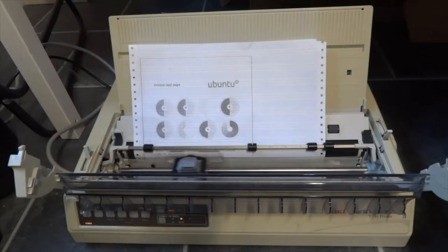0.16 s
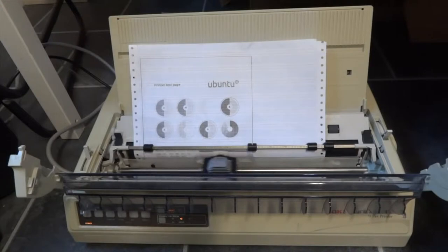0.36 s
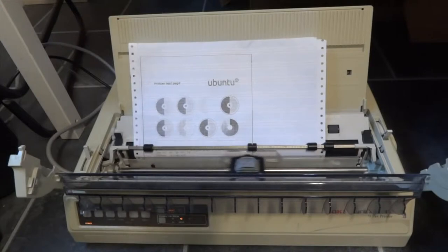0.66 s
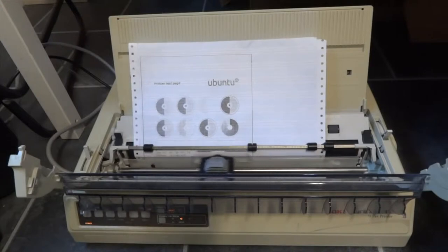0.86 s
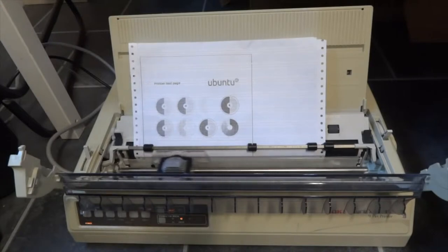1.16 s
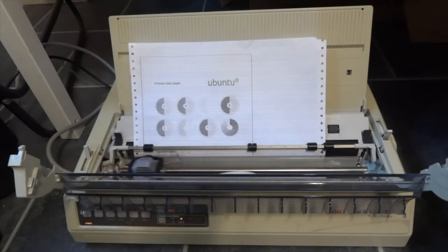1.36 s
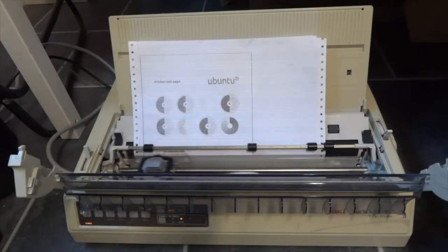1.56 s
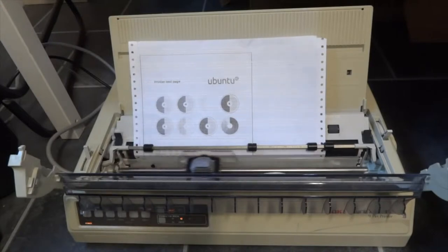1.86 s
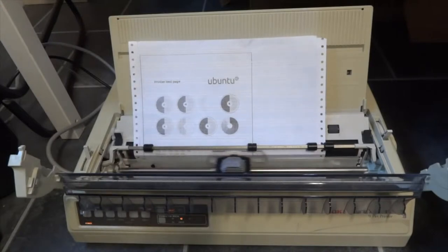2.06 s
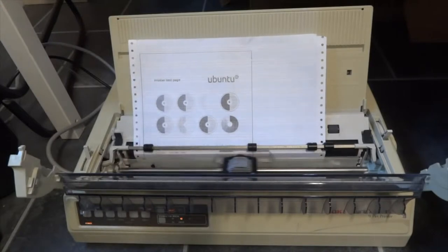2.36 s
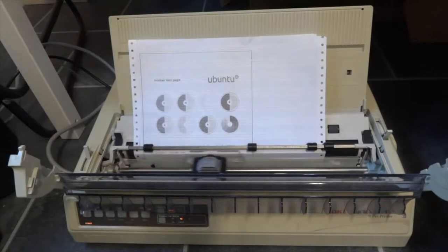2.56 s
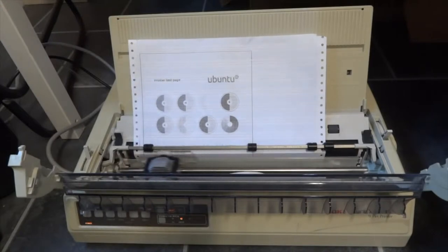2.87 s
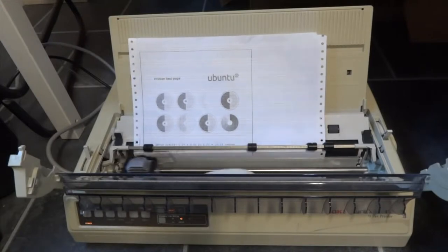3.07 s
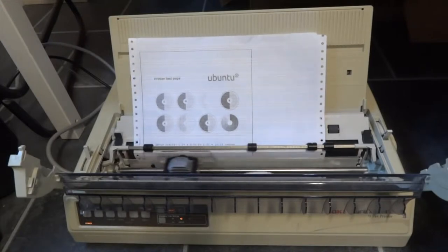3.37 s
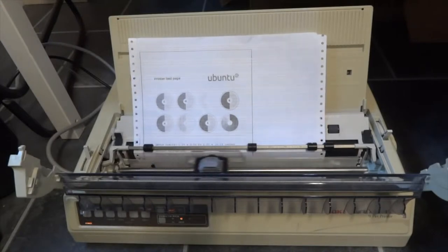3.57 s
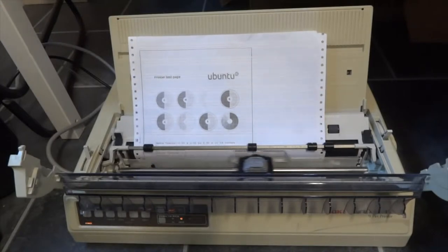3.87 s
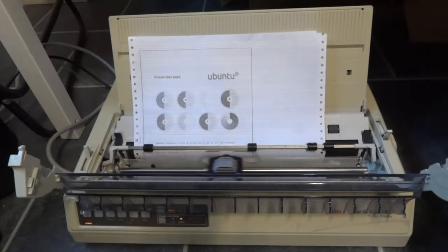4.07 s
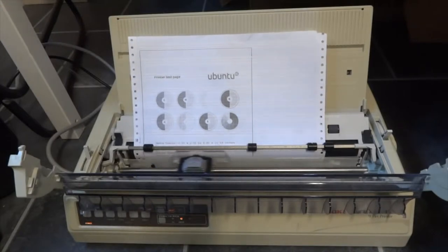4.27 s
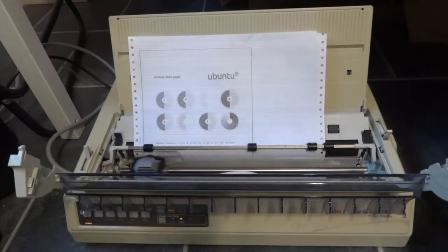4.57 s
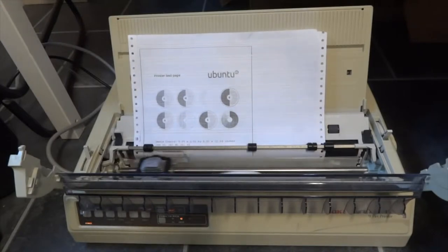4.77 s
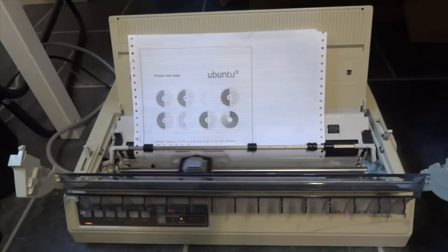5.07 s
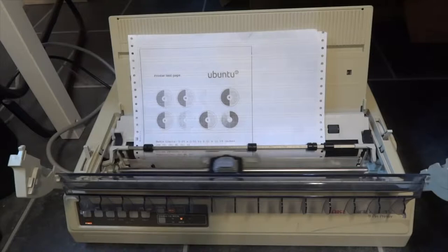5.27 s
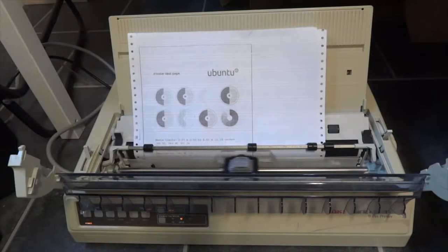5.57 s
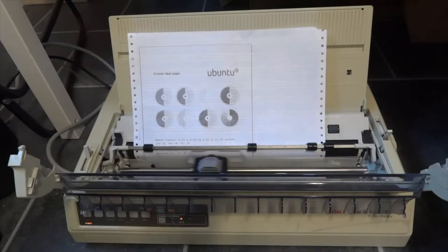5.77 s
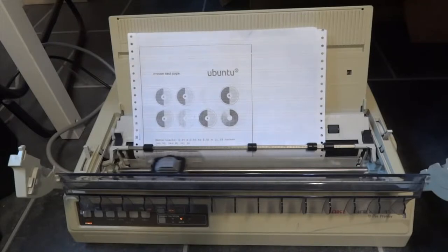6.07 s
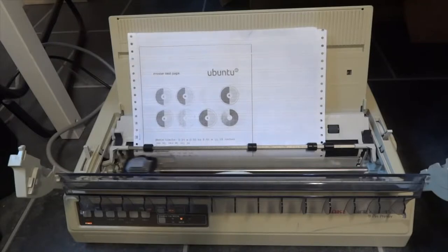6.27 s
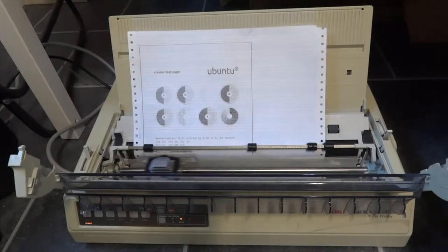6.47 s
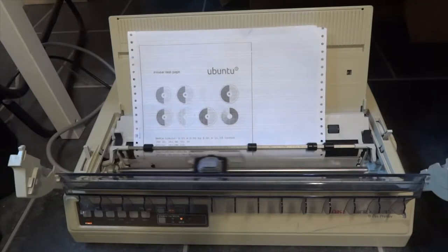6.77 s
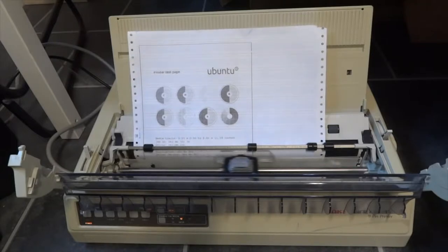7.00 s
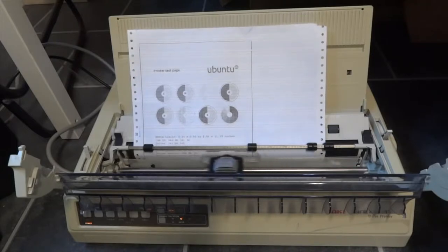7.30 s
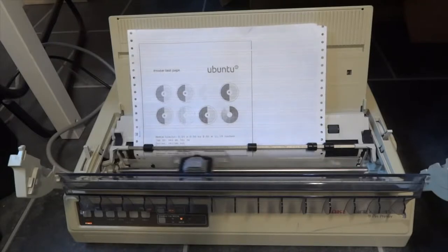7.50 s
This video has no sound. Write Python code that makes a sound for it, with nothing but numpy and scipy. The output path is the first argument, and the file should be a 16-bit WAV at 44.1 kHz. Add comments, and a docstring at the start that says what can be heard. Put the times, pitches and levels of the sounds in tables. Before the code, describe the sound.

A dot matrix printer rasps out short buzzing bursts while its carriage whines and rattles back and forth, feeding paper at each turn.

```python
"""A rasping buzz of pins on paper, soft at first: a dot matrix printer about a metre away in a small room.
It prints text inside a ruled frame. Pins strike on a fixed column clock, letter by letter; the head's
shell sings where like letters repeat. The stepper-driven carriage whines, rattles and knocks to and fro.
At each turn the head ticks off the frame line, the feed shoves the sheet on, and the head ticks again.
A brief low rumble lies under the opening."""
import sys
import numpy as np
from scipy import signal
from scipy.fft import rfft, irfft
from scipy.io import wavfile
from scipy.ndimage import uniform_filter1d

SR = 44100
rng = np.random.default_rng(int(sys.argv[2]) if len(sys.argv) > 2 else 0)


def put_to_file(sound):
    """Save the sound as 16-bit audio at rate SR, in the file named by the first command-line argument."""
    columns = np.atleast_2d(sound).T  # one column per channel
    safe = np.clip(columns, -1, 1)
    whole_steps = np.round(safe * 32767)
    wavfile.write(sys.argv[1], SR, whole_steps.astype(np.int16))


N = 336924
T = np.arange(N) / SR
COLUMN_HZ, TOOTH_HZ = 1247., 181.2
STEP_HZ = COLUMN_HZ / 4
TURN_S, CRACK_DB = .068, -41.5

# carriage turns, right and left margin alternately: (time [s], relative feed level [dB])
TURN_FEEDS = [(0.614, 0), (1.4303, -0.5), (2.245, 0.5), (3.0579, 1.5), (3.8693, 0), (4.684, 0.5),
              (5.493, 1), (6.305, 0.5), (7.1157, 0.5)]
TURNS_S = [s for s, _ in TURN_FEEDS]
PASS_S = np.mean(np.diff(TURNS_S))
# text lines: (start [s], end [s], then relative levels of
# head buzz [dB], lower shell ring [dB], upper shell ring [dB], crack [dB], sizzle [dB])
TEXT_LINES = [(0, 0.163, -49.5, -58, -74, -0.5, 3), (1.586, 1.8, -49, -68, -53.5, -0.5, 2),
              (2.761, 2.972, -57.5, -55.5, -51, 0, 4.5), (3.212, 3.469, -50, -66, -61, 1, 1),
              (4.342, 4.596, -57, -61, -53.5, 1.5, 0.5), (4.837, 5.127, -49.5, -63, -48.5, 0, 2),
              (5.93, 6.224, -56, -59, -55, 1.5, 0), (6.457, 7.086, -50.5, -64, -56, 0.5, 1),
              (7.217, 7.633, -49, -62, -45.5, 1, -1)]
# word spaces: (time [s])
SPACES_S = [2.798, 2.901, 3.351, 3.433, 4.378, 4.458, 5.01, 5.049, 5.963, 6.048, 6.147, 6.507, 7.364]
# runs of like letters: (start [s], end [s], lower ring change [dB], upper ring change [dB])
LETTER_RUNS = [(2.906, 2.97, -11, 8.5), (6.774, 6.839, -3, 2), (6.84, 7.09, 13.5, 11.5),
               (7.237, 7.357, 10, 0)]
# higher resonances of the head's shell: (frequency [Hz], width [Hz], relative level [dB])
SHELL_OVERTONES = [(3720, 260, -15.5), (5010, 300, -14), (6250, 300, -17.5)]
# carriage and ribbon drive knocks at set times: (time [s], relative clack [dB], relative thump [dB])
KNOCKS = [(.379, -42, -60), (.453, -43, -62), (.7777, -39.5, -69), (.892, -46, -67), (1.0318, -46, -58),
          (1.113, -42.5, -54), (1.253, -46, -54), (1.933, -38, -53), (2.0324, -49.5, -48.5),
          (2.084, -41, -51), (2.441, -43, -64), (2.593, -43, -62), (2.6854, -45, -46.5), (3.607, -42, -46),
          (3.8586, -39.5, -52), (4.157, -38, -59), (4.2125, -40, -68), (4.3167, -37, -48.5),
          (4.6147, -41, -49), (5.157, -58, -46), (5.243, -39.5, -53), (5.33, -45.5, -60),
          (5.9062, -41, -61)]
# case resonances: (frequency [Hz], relative level [dB], t60 [s])
CASE_RESONANCES = [(362.5, -5, .14), (411, -2.5, 0.15), (499, -6.5, .1), (634, -10, .1), (954, -4, 0.13)]
# carriage motor tones: (multiple of step rate, relative level [dB])
STEPPER_HARMONICS = [(5, -81), (6, -68), (7, -74.5), (8, -68.5), (9, -78.5), (10, -79), (11, -73.5),
                     (12, -82), (13, -77.5), (14, -80.5), (15, -78.5), (18, -84), (19, -84)]
# belt tones: (multiple of tooth rate, relative level [dB], rise at resonance [dB])
BELT_HARMONICS = [(2, -75, 3.5), (3, -74.5, 8.5), (6, -84.5, 4)]
# overall swell: (time [s], gain [dB])
SWELL_DB = [(0, -7), (.65, -6), (1.15, -0.5), (1.6, -1)]

# source spectra: (frequency [Hz], relative level [dB])
RUMBLE_SPECTRUM = [(25, -11), (60, -19), (110, -2), (210, -1), (330, -4), (600, -8), (2000, -46)]
RAIL_SPECTRUM = [(1500, -24), (3500, 5), (5500, 1.5), (8000, 0), (11800, -4), (16000, -11)]
RATTLE_SPECTRUM = [(40, -56), (90, -31), (150, -28.5), (190, -9.5), (290, -11), (370, 0), (550, -1),
                   (720, -2.5), (860, -10), (970, 0.5), (1150, -2), (1400, -5.5), (2050, -5.5), (2450, -1),
                   (3000, -12), (5000, -25.5), (12000, -33)]
CLACK_SPECTRUM = [(200, -31), (700, -9.5), (1100, -1), (1900, -1), (2450, 2.5), (3100, -7), (5000, -18),
                  (12000, -29)]
THUMP_SPECTRUM = [(60, -37), (150, -32), (240, -0.5), (370, 0), (560, -1), (750, 1.5), (1050, -14),
                  (1600, -20), (5000, -44)]
FEED_SPECTRUM = [(40, -48), (110, -25), (180, -16.5), (290, -10), (430, 4), (680, -1), (820, -3),
                 (960, 2.5), (1220, -9.5), (1710, -1.5), (2400, -4), (3500, -7.5), (6200, -10.5),
                 (10000, -11), (15000, -37)]
TICK_SPECTRUM = [(590, -42), (1000, -9.5), (1690, -2), (3710, -9), (4360, -5), (4900, -10), (5440, 0.5),
                 (6400, -7), (7270, 0.5), (7790, -5), (9600, 0), (12500, -5), (16000, -14)]
BUZZ_SPECTRUM = [(300, -33.5), (800, -15), (1250, -3.5), (1700, 1), (2150, -5), (2550, 5), (2950, -7),
                 (3400, 3), (3750, 0), (4400, -1.5), (5050, -8), (5600, -3.5), (12000, -28.5)]
RIGHTWARD_CRACK_SPECTRUM = [(600, -51), (1500, -24), (3000, -24), (4400, -16), (5100, -3), (6200, -2.5),
                            (6800, -2.5), (7500, 3), (8100, -1.5), (8800, 2.5), (11000, -0.5),
                            (12500, -1.5), (14500, -7), (16000, -11.5)]
LEFTWARD_CRACK_SPECTRUM = [(600, -53), (1500, -35), (3000, -11), (4400, -15.5), (5100, -8), (6200, -6.5),
                           (6800, -6), (7500, -2), (8100, -4), (9000, 0.5), (10000, -0.5), (11500, -3.5),
                           (13500, -9), (16000, -14)]

# stereo phase: (frequency [Hz], left lead [rad])
LEFT_LEAD_RAD = [(100, 0.5), (350, 0.29), (950, 0.5), (2000, 0.35), (3100, 0)]
# stereo balance: (frequency [Hz], left minus right [dB])
BALANCE_DB = [(250, 0), (600, 0.27), (1100, 0.92), (2000, 0)]
# side reflections: (frequency [Hz], level [dB])
SIDE_DB = [(60, -24), (300, -22), (1000, -12), (2000, -22), (4000, -42.5), (12000, -51.5)]


def undb(db):
    """Decibels to gain."""
    return 10 ** (np.asarray(db) / 20)


def noise():
    """Unit-power white noise."""
    return rng.standard_normal(N)


def walk(rate_hz):
    """Random held levels, smoothed twice; deviation near 1."""
    hold = max(int(SR / rate_hz), 1)
    levels = np.repeat(noise()[:N // hold + 1], hold)
    return 1.25 * uniform_filter1d(uniform_filter1d(levels, hold), hold)[:N]


def on_log(points, hz):
    """Interpolate on a log-frequency axis."""
    point_hz, value = np.transpose(points)
    return np.interp(np.log(hz + 1), np.log(point_hz), value)


def conv(x, response):
    """Convolve, cut to scene length."""
    return signal.fftconvolve(x, response)[:N]


def colour(x, spectrum, size=2048):
    """Minimum-phase filter; white input keeps its power."""
    gain = undb(on_log(spectrum, np.fft.rfftfreq(size, 1 / SR)))
    cepstrum = irfft(np.log(gain))
    cepstrum[1:size // 2] *= 2
    cepstrum[size // 2 + 1:] = 0
    response = irfft(np.exp(rfft(cepstrum)))
    return conv(x, response / np.linalg.norm(response))


def dense_ring(t60_s):
    """Unit-energy response of dense modes decaying together."""
    t = T[:SR // 2]
    response = rng.standard_normal(len(t)) * np.exp(-np.log(1000) * t / t60_s)
    return response / np.linalg.norm(response)


def clicks(times_s, sizes, order=8):
    """Sub-sample impulses by windowed sinc."""
    at = np.asarray(times_s)[:, None] * SR
    index = at.astype(int) + np.arange(1 - order, order + 1)
    shape = np.sinc(index - at) * np.cos(np.pi / 2 * (index - at) / order) ** 2
    inside = (index >= 0) & (index < N)
    return np.bincount(index[inside], (shape * np.asarray(sizes)[:, None])[inside], N)


def burst(force, decay_s):
    """Each impulse becomes a noise puff of equal energy."""
    fade = np.exp(-T[:SR // 4] / decay_s)
    return noise() * np.sqrt(np.abs(conv(force ** 2, fade / fade.sum())))


def spread(x, max_delay_s=.001628, size=1024):
    """Unequal paths through the plastic delay each frequency differently."""
    hz = np.fft.rfftfreq(size, 1 / SR)
    delay_s = np.interp(hz, np.linspace(0, SR / 2, size // 16), max_delay_s * rng.random(size // 16))
    return conv(x, irfft(np.exp(-2j * np.pi * np.cumsum(delay_s) * hz[1])))


def travel_state():
    """Time since the last turn [s]; 1 leftward, 0 rightward."""
    passes = np.searchsorted(TURNS_S, T)
    starts_s = np.r_[TURNS_S[0] - PASS_S, TURNS_S]
    return T - starts_s[passes], passes % 2


def rumble():
    """Brief low rumble at the microphone."""
    return colour(noise(), RUMBLE_SPECTRUM) * undb(-61) * np.interp(T, [0, .27, .3], [1.1, .8, 0])


def room(x, tail_db, echo_db, t60_s=.33, echo_s=.0115, positions=5):
    """Near-surface echo and short tail; both change as the head travels."""
    place = (positions - 1) * np.abs(((T - TURNS_S[0]) / PASS_S) % 2 - 1)
    out = x
    for k in range(positions):
        near = x * np.sqrt(np.clip(1 - np.abs(place - k), 0, 1))
        echo = np.pad(dense_ring(.024), (int(echo_s * SR), 0))[:SR // 2]
        tail = np.pad(dense_ring(t60_s), (int(.005 * SR), 0))[:SR // 2]
        out = out + conv(near, undb(echo_db) * echo + undb(tail_db) * tail)
    return out


def stereo(x):
    """Two close microphone ports differ in level, phase and side reflections."""
    hz = np.fft.rfftfreq(N, 1 / SR)
    lean = undb(on_log(BALANCE_DB, hz) / 2) * np.exp(1j * on_log(LEFT_LEAD_RAD, hz) / 2)
    side = rfft(conv(x, dense_ring(.05))) * undb(on_log(SIDE_DB, hz))
    return irfft(np.array([rfft(x) * lean + side, rfft(x) / lean - side]), N)


def case_response():
    """Ring of the plastic case after one blow."""
    t = T[:SR // 2]
    return sum(undb(db) * np.cos(2 * np.pi * hz * t) * np.exp(-np.log(1000) * t / t60_s)
               for hz, db, t60_s in CASE_RESONANCES)


def rail_hiss(motor_s, pass_db):
    """The head slides on its rail, jerked by each motor step."""
    jerk_db = 2.5 * np.sin(2 * np.pi * STEP_HZ * motor_s)
    return colour(noise(), RAIL_SPECTRUM) * undb(-64.5 + jerk_db + pass_db / 2)


def belt_rattle(pass_db, pulley_hz=26.2):
    """Belt teeth rattle the case; an out-of-round pulley wobbles the level."""
    times_s = np.arange(0, T[-1], 1 / TOOTH_HZ)
    jitter, scatter = rng.standard_normal((len(times_s), 2)).T
    teeth = clicks(times_s + .00033 * jitter, undb(3.46 * scatter))
    teeth = burst(teeth / teeth.std(), .0052)
    wobble_db = 1.35 * np.sin(2 * np.pi * pulley_hz * T) + .37 * walk(25)
    return colour(teeth * undb(-59.5 + pass_db + wobble_db), RATTLE_SPECTRUM)


def drive_whine(motor_s, pass_db, rough_rad=.45):
    """Stepper and belt tones, stopping at each turn; the taut belt span resonates going right."""
    since_s, leftward = travel_state()
    stopped = sum(np.exp(-((T - s - TURN_S / 2) / .042) ** 2) for s in TURNS_S)
    resonance = (1 - leftward) * np.exp(-((since_s - .5) / .16) ** 2)
    tones = [(k * STEP_HZ, db) for k, db in STEPPER_HARMONICS]
    tones += [(k * TOOTH_HZ, db + rise_db * resonance) for k, db, rise_db in BELT_HARMONICS]
    whine = np.zeros(N)
    for hz, db in tones:
        gain = undb(db + 2 * walk(18))
        whine += gain * np.sin(2 * np.pi * (hz * motor_s + rng.random()) + rough_rad * walk(90))
    return whine * (1 - np.clip(stopped, 0, 1)) * undb(3.5 + pass_db / 2)


def carriage():
    """Belt-driven carriage, louder rightward and mid-pass. Returns (rattle and hiss, whine)."""
    since_s, leftward = travel_state()
    pass_db = 1.5 * (1 - leftward) + np.exp(-((since_s - .45) / .13) ** 2)
    rattle = belt_rattle(pass_db)
    motor_s = T + np.cumsum(.0028 * walk(30)) / SR  # speed wanders
    whine = drive_whine(motor_s, pass_db)
    return rattle + rail_hiss(motor_s, pass_db), whine


def knocks(scattered_count=12, decay_s=.0035):
    """Play in carriage and ribbon drive: a clack over a thump. Returns (blows, case ring)."""
    scattered_s = (np.arange(scattered_count) + rng.random(scattered_count)) * T[-1] / scattered_count
    scattered_db = [-42.5, -59] - 2 * rng.standard_normal((scattered_count, 2))
    times_s, clack_db, thump_db = np.vstack([KNOCKS, np.column_stack([scattered_s, scattered_db])]).T
    clack = colour(burst(clicks(times_s, undb(clack_db + 15)), decay_s / 2), CLACK_SPECTRUM)
    thump = colour(burst(clicks(times_s, undb(thump_db + 21.5)), decay_s), THUMP_SPECTRUM)
    case_ring = conv(clicks(times_s, undb(thump_db - 10)), case_response())
    return clack + thump, case_ring


def paper_feed(step_hz=470., feed_db=-44):
    """The feed motor steps through loose gears at each turn; the slack closes with a thud."""
    # (time after turn [s], level [dB])
    stroke = [(0, -34), (.008, -2.5), (.016, -4.5), (.027, -2.5), (.034, 2.5), (.047, 0), (.056, -11),
              (.064, -21), (.08, -13), (.11, -12.5), (.15, -52)]
    effort = sum(undb(feed_db + db + np.interp(T - s, *np.transpose(stroke), left=-99, right=-99))
                 for s, db in TURN_FEEDS)
    times_s = np.arange(0, T[-1], 1 / step_hz)
    jitter, scatter = rng.standard_normal((N // 20, 2))[:len(times_s)].T
    steps = clicks(times_s + jitter / step_hz / 2, undb(2.2 * scatter))
    steps /= steps.std()
    drive = effort * (.59 * spread(steps) + .84 * burst(steps, .0028))
    return colour(drive, FEED_SPECTRUM) + undb(-39) * conv(drive, case_response())


def frame_ticks(out_db=-19, back_db=-18, columns=3):
    """All pins fire on the frame line, once going out, once coming back."""
    columns_s = np.arange(columns) / COLUMN_HZ
    times_s = [s + lag_s + c for s in TURNS_S for lag_s in (0, TURN_S) for c in columns_s]
    force = clicks(times_s, np.tile(np.repeat(undb([out_db, back_db]), columns), len(TURNS_S)))
    snap = colour(burst(force, .0015), [(400, -40), *TICK_SPECTRUM])
    return snap + undb(-8.5) * colour(burst(force, .003), BUZZ_SPECTRUM)


def in_runs(times_s):
    """Mask of the columns inside each run of like letters."""
    return np.array([(times_s >= start_s) & (times_s < end_s) for start_s, end_s, _, _ in LETTER_RUNS])


def letters(start_s, end_s, cell_columns=14, ink_columns=9, space_s=.014, blank_share=.04):
    """One line of letter cells, each inked, then blank. Returns column (time [s], force, lag [s])."""
    times_s = np.arange(round(start_s * COLUMN_HZ), round(end_s * COLUMN_HZ)) / COLUMN_HZ
    word_starts_s = np.sort(np.r_[times_s[0], np.array(SPACES_S) + space_s / 2])
    word = np.searchsorted(word_starts_s, times_s, side="right") - 1
    letter, place = np.divmod(np.arange(len(times_s)) - np.searchsorted(word, word), cell_columns)
    cell = np.cumsum(place == 0) - 1
    draws = SR // cell_columns
    width, letter_db, lag = rng.standard_normal((draws, 3))[cell].T
    scatter_db = 3.5 * rng.standard_normal(draws)[:len(times_s)]
    blank = (rng.random(draws)[cell] < blank_share) & (letter > 1)
    blank |= np.abs(times_s[:, None] - SPACES_S).min(axis=1) < space_s / 2
    inked = place < ink_columns + width + 1.7 * in_runs(times_s).any(axis=0)
    # rested magnets hit a word's first letter harder, a line's hardest
    rested_db = 1.75 * (letter == 0) + 1.5 * (cell == 0)
    force = ~blank * inked * undb(letter_db + scatter_db + rested_db)
    lag_s = .00004 * lag  # each letter's pins land early or late, roughening high harmonics
    return times_s, force / np.sqrt(np.mean(force[~blank] ** 2)), lag_s


def shell_mode(force, hz, width_hz):
    """One resonance of the head's shell."""
    return signal.lfilter(*signal.iirpeak(hz, hz / width_hz, SR), force) * np.sqrt(SR / COLUMN_HZ / 2)


def head_shell(fired_s, force, lag_s, lower_db, upper_db):
    """The shell rings near multiples of the column rate; like letters pump it with the same pins."""
    in_run = in_runs(fired_s)
    lower_run_db, upper_run_db = np.array(LETTER_RUNS)[:, 2:].T @ in_run
    lower = clicks(fired_s + 2.1 * lag_s, force * undb(lower_db + lower_run_db + 1))
    upper = clicks(fired_s + 1.2 * lag_s, force * undb(upper_db + upper_run_db - 6))
    pump = clicks(fired_s + 1.06 * lag_s, force * undb(CRACK_DB + 2.5 * in_run.any(axis=0)))
    overtones = sum(shell_mode(pump, hz, width_hz) * undb(db + 2.5 * walk(45))
                    for hz, width_hz, db in SHELL_OVERTONES)
    return spread(overtones) + shell_mode(lower, 1273, 170) + shell_mode(upper, 2430, 330)


def sizzle(crack, edge_hz=10000.):
    """Pins in use vary by line and word, so the top of the crack comes and goes."""
    hz = np.fft.rfftfreq(N, 1 / SR)
    top = irfft(rfft(crack) * (1 - 1 / (1 + (hz / edge_hz) ** 10)), N)
    lines = np.array(TEXT_LINES)
    line_db = lines[np.searchsorted(lines[1:, 0], T), -1]
    return crack + top * (undb(line_db + 1.66 * walk(14)) - 1)


def paper_crack(impact):
    """Pins hit the paper; the timbre depends on the direction of travel."""
    snap = undb(-5.5) * spread(impact) + undb(-3.5) * burst(impact, .0022)
    _, leftward = travel_state()
    return (colour(snap * leftward, LEFTWARD_CRACK_SPECTRUM)
            + colour(snap * (1 - leftward), RIGHTWARD_CRACK_SPECTRUM))


def pins(jitter_s=.000017, run_buzz_db=3.5):
    """Pins crack on the paper, shake the head and ring its shell. Returns (strikes, shell ring)."""
    rows = []
    for start_s, end_s, *levels_db in TEXT_LINES:
        times_s, force, lag_s = letters(start_s, end_s)
        force = force * np.sqrt(SR / COLUMN_HZ)
        rows.append(np.column_stack([times_s, force, lag_s, np.tile(levels_db, (len(times_s), 1))]))
    fired_s, force, lag_s, buzz_db, lower_db, upper_db, crack_db, _ = np.vstack(rows).T
    alike = in_runs(fired_s).any(axis=0)
    lag_s = lag_s * np.where(alike, .77, 1)
    landed_s = fired_s + lag_s + jitter_s * rng.standard_normal(len(fired_s))
    crack = paper_crack(clicks(landed_s, force * undb(CRACK_DB + crack_db)))
    shake = clicks(landed_s, force * undb(buzz_db + run_buzz_db * alike))
    buzz = colour(undb(-10) * spread(shake) + undb(-1) * burst(shake, .003), BUZZ_SPECTRUM)
    shell_ring = head_shell(fired_s, force, lag_s, lower_db, upper_db)
    return sizzle(crack) + buzz, shell_ring


def scene():
    """The printer in its room, in stereo; the tones arrive drier than the noises."""
    strikes, shell_ring = pins()
    rattle, whine = carriage()
    blows, case_ring = knocks()
    noises = room(strikes + frame_ticks() + paper_feed() + rattle + blows, tail_db=-4.5, echo_db=-6.5)
    tones = room(shell_ring + case_ring + whine, tail_db=-5, echo_db=-14)
    swell = undb(np.interp(T, *np.transpose(SWELL_DB)))
    return stereo((noises + tones) * swell) + rumble()


def record(dry):
    """Steep low-pass at 15.9 kHz."""
    return signal.sosfilt(signal.ellip(10, .2, 70, 15900, fs=SR, output="sos"), dry)


dry = scene()
out = record(dry)
put_to_file(out)
```